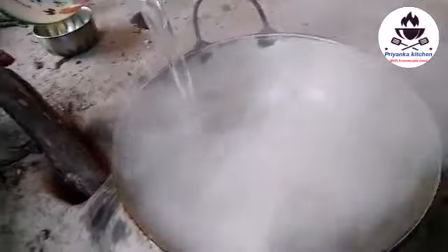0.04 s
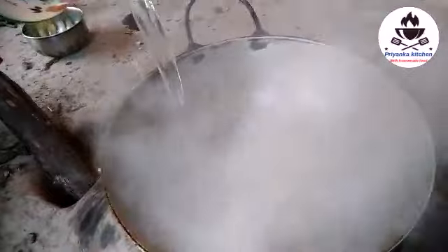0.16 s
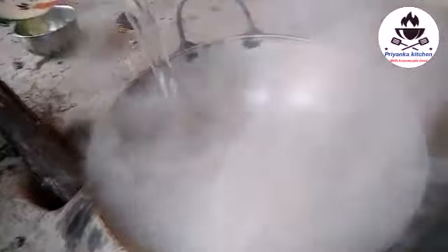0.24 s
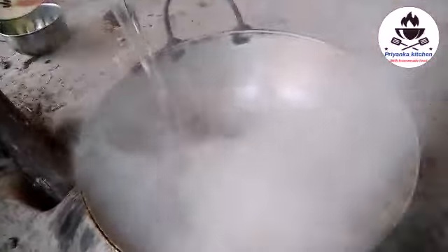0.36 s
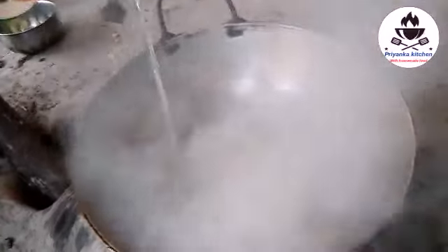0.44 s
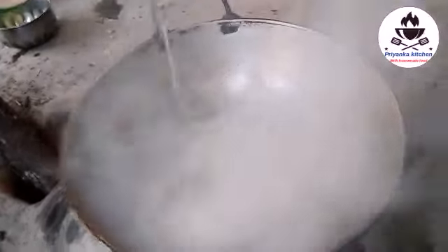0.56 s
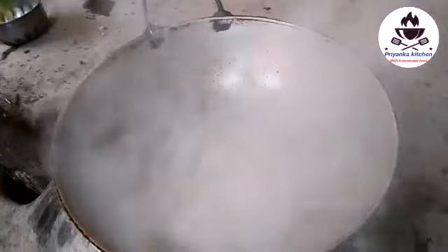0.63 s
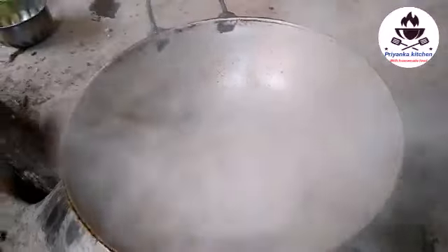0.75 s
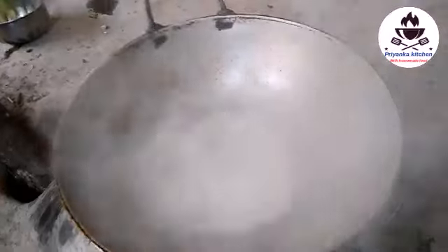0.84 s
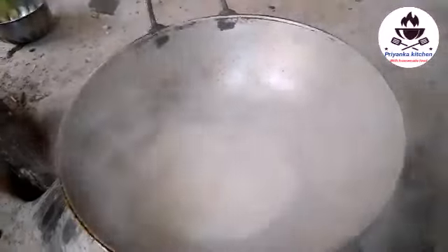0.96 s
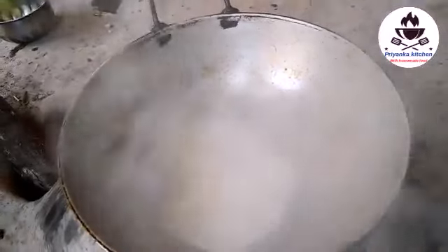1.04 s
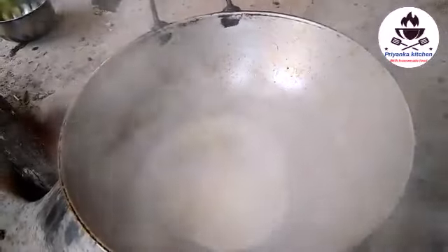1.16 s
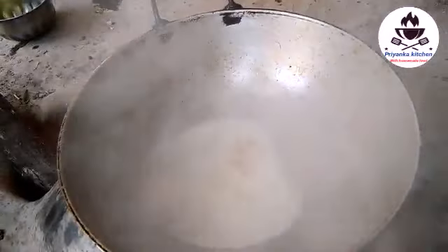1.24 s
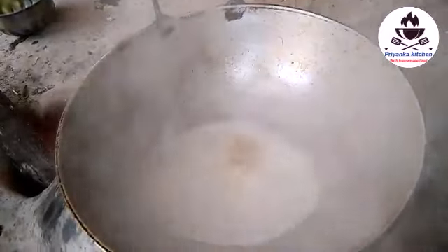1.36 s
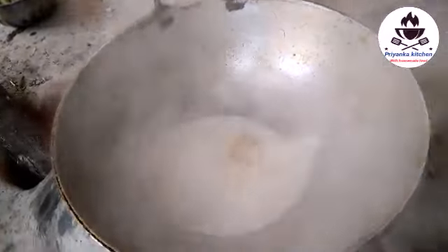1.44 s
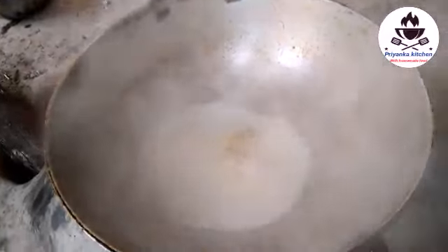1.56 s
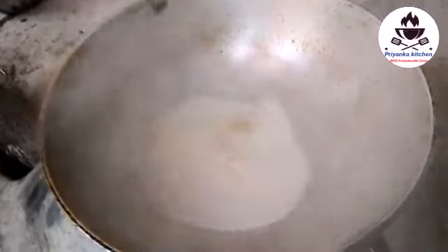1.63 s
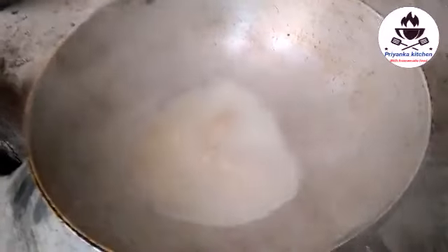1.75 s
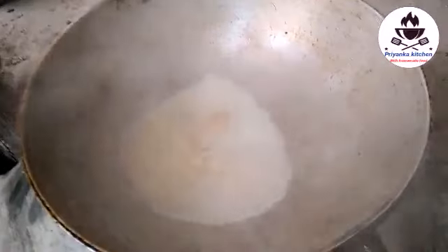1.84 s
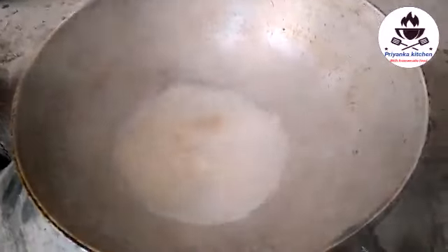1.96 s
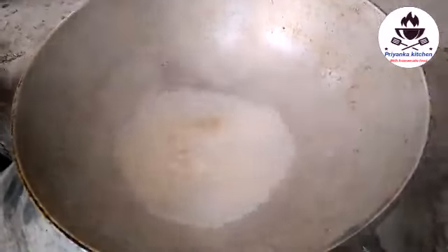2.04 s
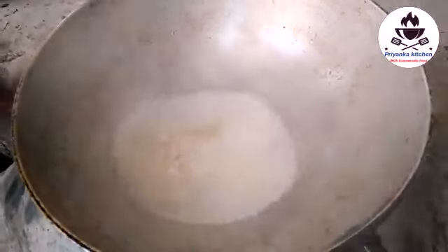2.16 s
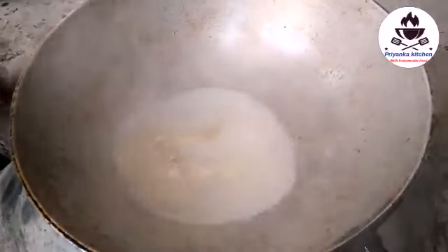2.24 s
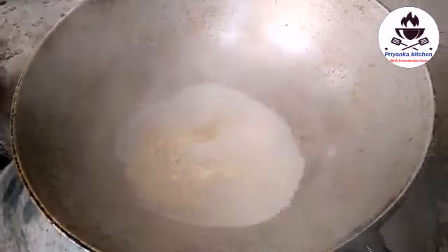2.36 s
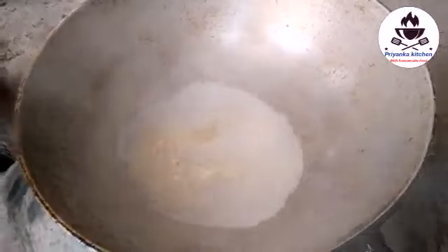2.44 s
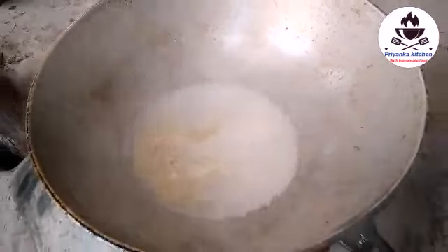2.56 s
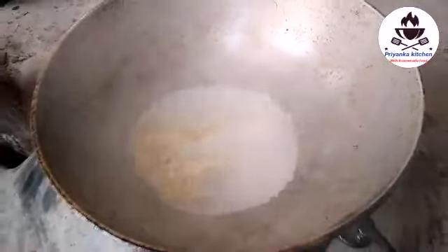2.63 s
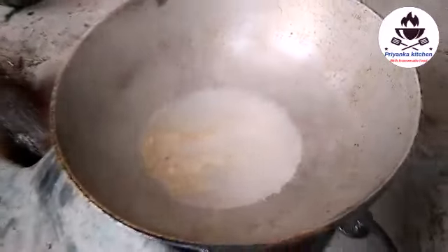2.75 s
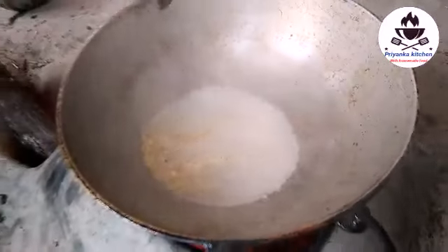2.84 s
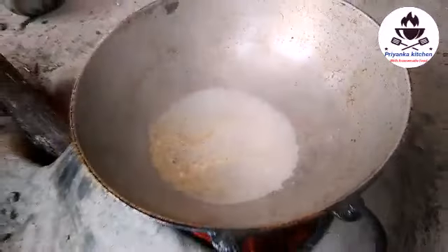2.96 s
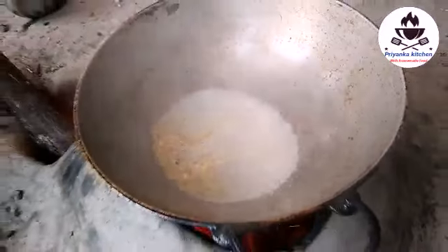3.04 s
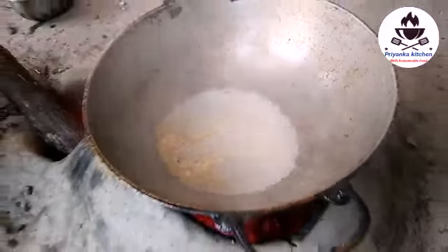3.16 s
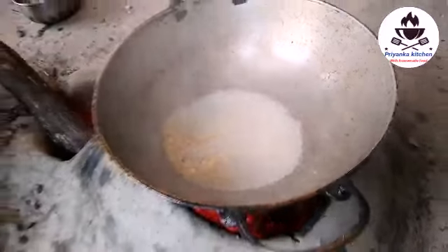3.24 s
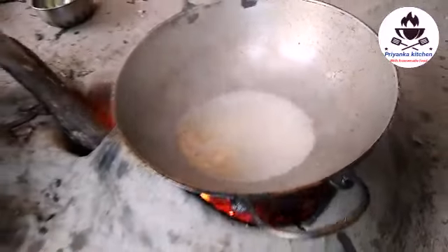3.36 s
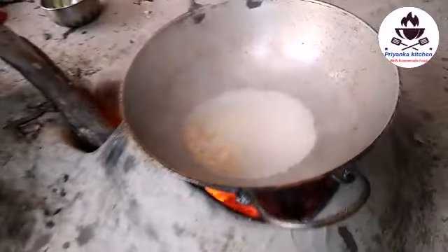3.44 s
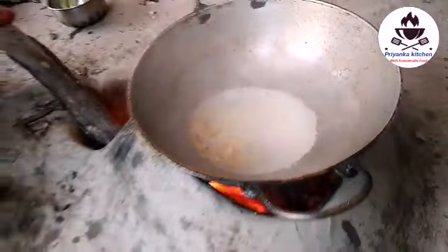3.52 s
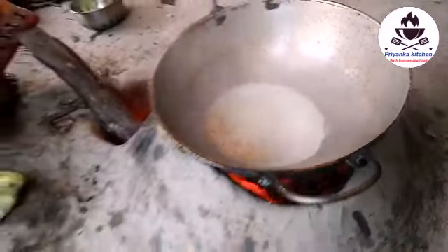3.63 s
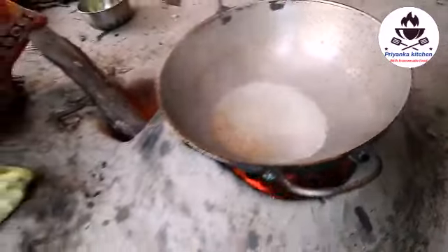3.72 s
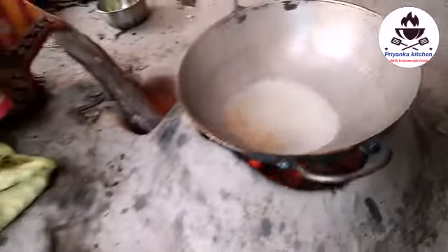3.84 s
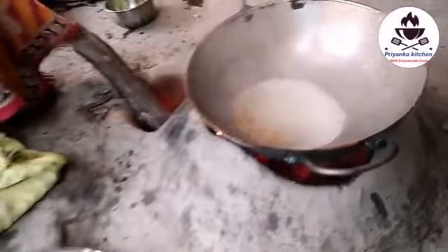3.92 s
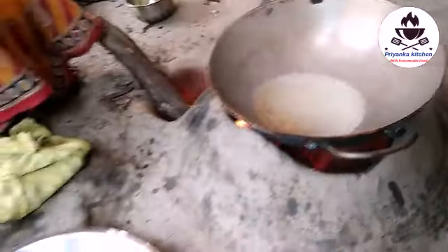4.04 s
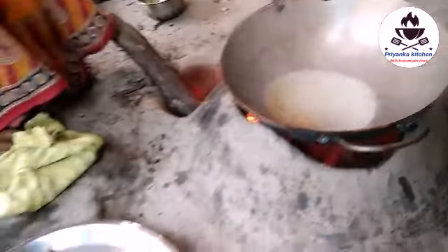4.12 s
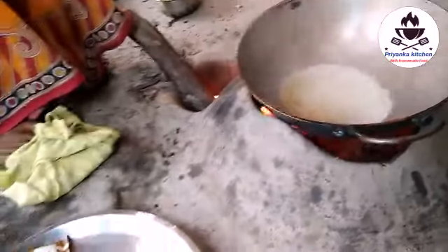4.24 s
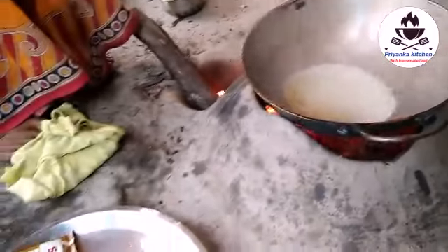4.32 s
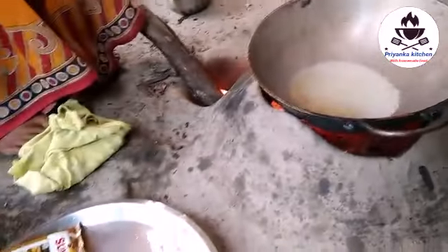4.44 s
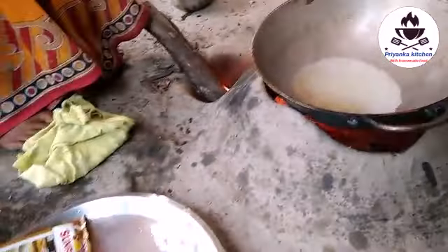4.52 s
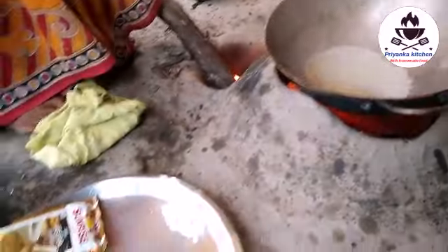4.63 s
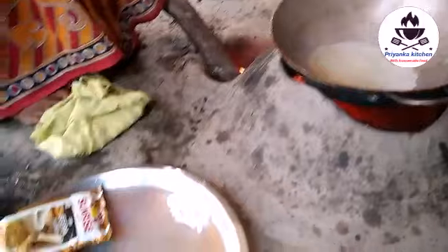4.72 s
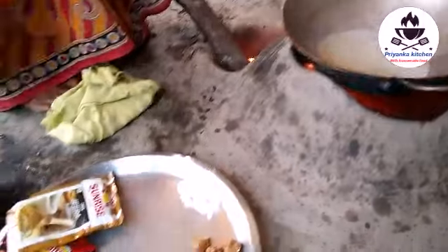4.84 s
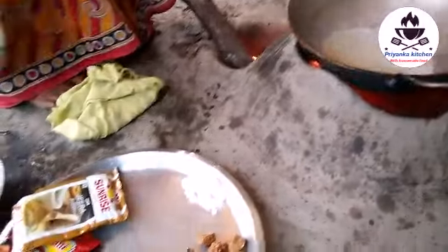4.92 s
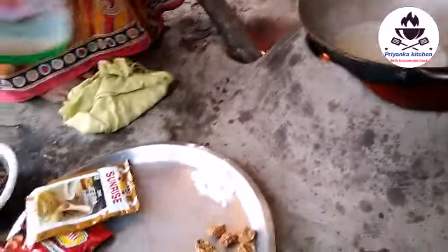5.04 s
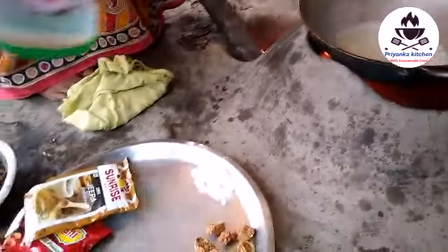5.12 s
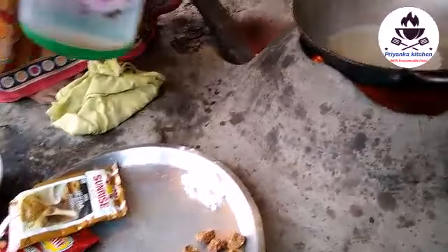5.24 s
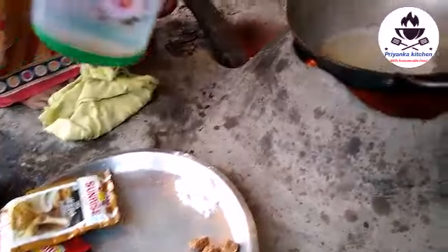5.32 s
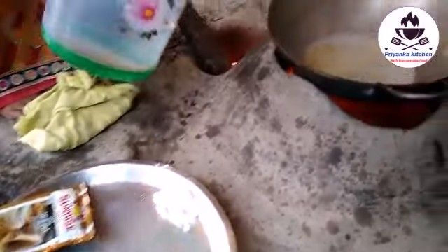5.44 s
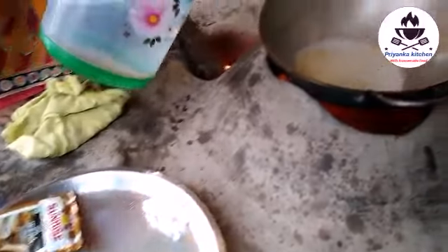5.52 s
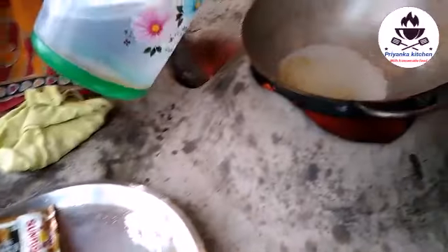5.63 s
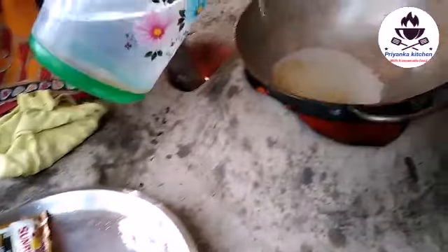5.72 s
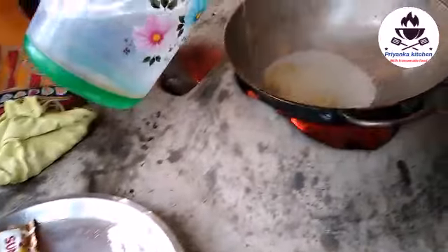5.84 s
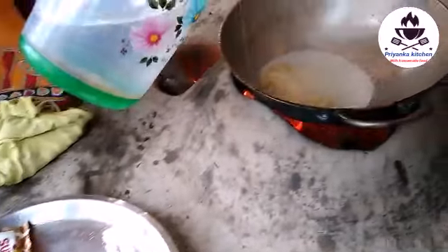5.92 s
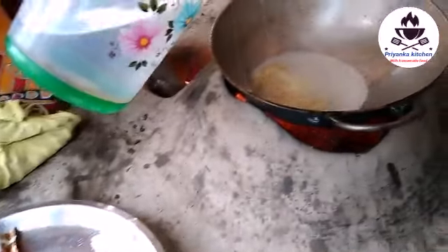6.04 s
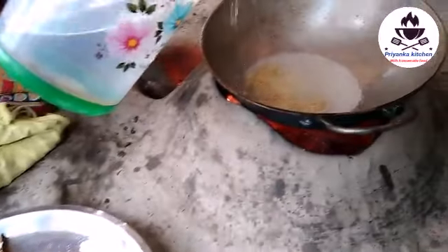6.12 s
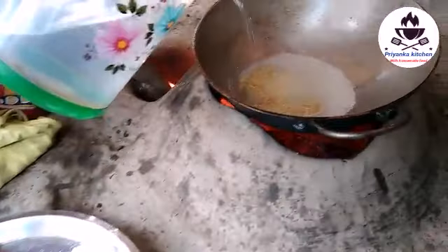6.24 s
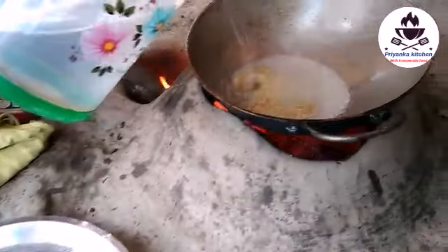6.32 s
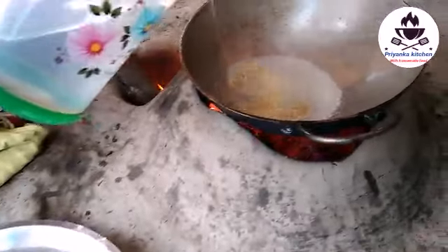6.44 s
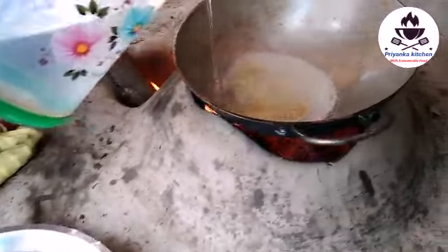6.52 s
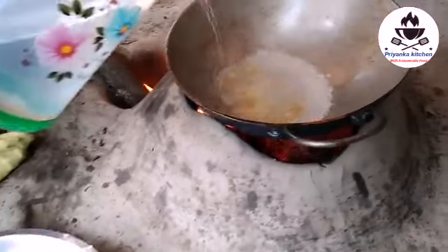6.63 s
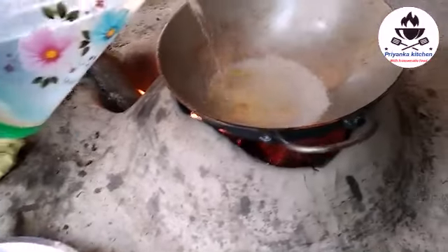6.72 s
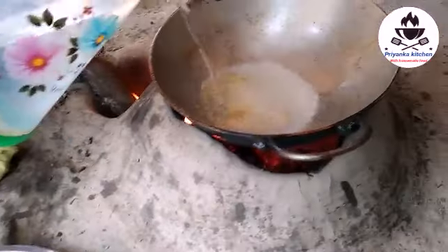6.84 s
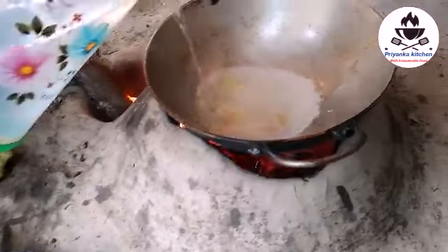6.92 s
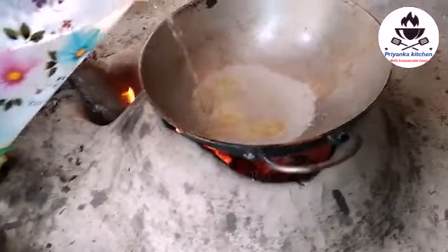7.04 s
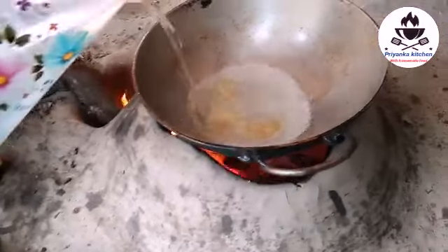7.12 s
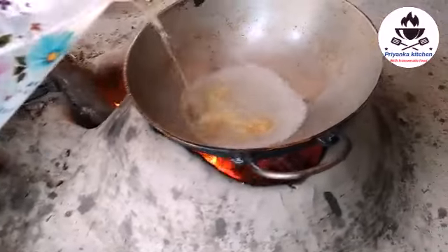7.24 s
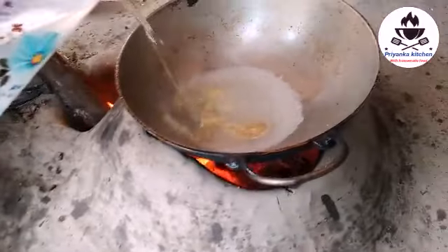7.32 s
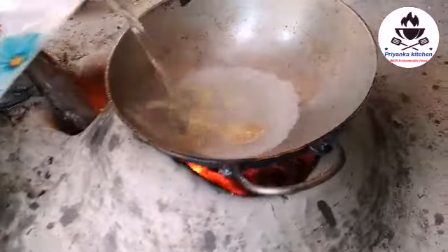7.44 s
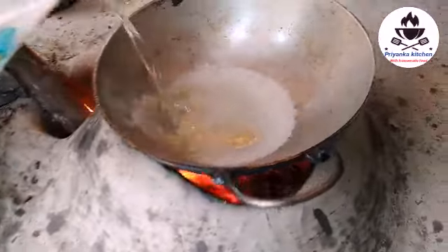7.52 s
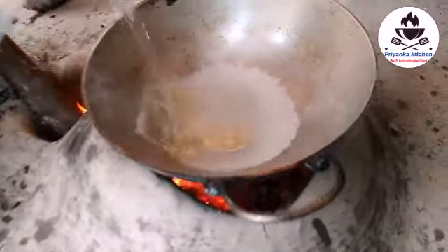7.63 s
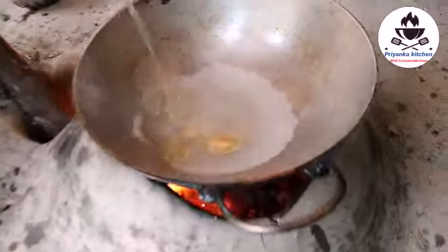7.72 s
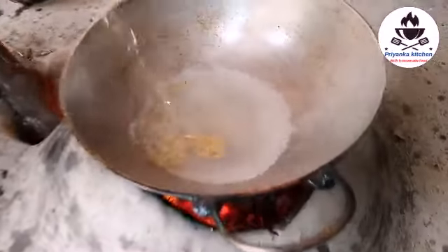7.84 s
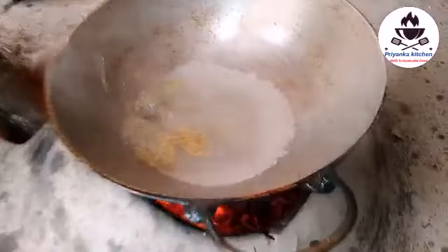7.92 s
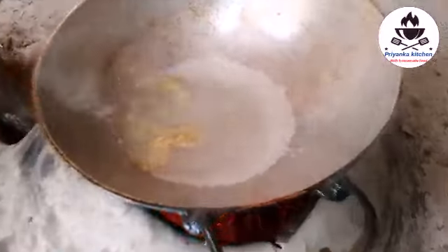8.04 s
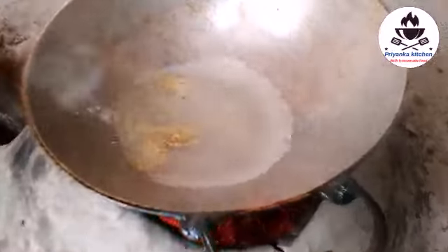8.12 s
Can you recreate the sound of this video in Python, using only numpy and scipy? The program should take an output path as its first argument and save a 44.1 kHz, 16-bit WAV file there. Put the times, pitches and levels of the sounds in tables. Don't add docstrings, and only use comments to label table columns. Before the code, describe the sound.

Close to a wide hot metal pan on a wood stove, poured water flashes into steam with a loud, dense hiss, crackling sizzle and low bubbling. After about three seconds the phone drifts away and the hiss thins. Near the end a second pour brings two sizzling flares, then the steam grows again. A stereo phone; no voice.

```python
import sys
import numpy as np
from scipy import signal
from scipy.fft import rfft, irfft, next_fast_len
from scipy.io import wavfile
from scipy.ndimage import uniform_filter1d, map_coordinates

SR = 44100
rng = np.random.default_rng(int(sys.argv[2]) if len(sys.argv) > 2 else 0)


def digitize_waveform(pressure):
    field = np.atleast_2d(pressure).T
    bounded = np.clip(field, -1, 1)
    quanta = np.round(bounded * 32767).astype(np.int16)
    wavfile.write(sys.argv[1], SR, quanta)


def linear_from_db(decibels):
    return 10 ** (np.asarray(decibels, float) / 20)


N = 360066
CONTROL = 64
FRAME_START = 836
LOUD_DB = -15


def unit(x):
    return x / np.sqrt(np.mean(x ** 2) + 1e-20)


def along(points, hz):
    f, v = np.transpose(points)
    return np.interp(np.log(hz + 1), np.log(f + 1), v)


def curves(rows):
    s, *cols = np.transpose(rows)
    return [np.interp(np.arange(N) / SR, s, c) for c in cols]


def spread(coarse):
    return np.interp(np.arange(N) / CONTROL, np.arange(len(coarse)), coarse)


def bump(start, length, rise, fall):
    t = np.arange(0, N + CONTROL, CONTROL) / SR - np.asarray(start)[:, None]
    left_over = np.asarray(length)[:, None] - t
    return np.clip(np.minimum(t / rise, 1 + left_over / fall), 0, 1)


def wobble(rate):
    steps = np.arange(0, N + 128, CONTROL)
    knots = rng.standard_normal(N // 100)
    return np.interp(np.arange(N), steps, map_coordinates(knots, [steps * rate / SR]))


# t/s, level/dB, left-right level/dB
STEAM = [(0, -14.5, -1.5), (1.0, -14, -2.4), (1.7, -15, -1.5), (2.1, -14.5, -2), (2.7, -16, -2),
         (3.1, -18, -2), (3.6, -20, -0.5), (4.1, -22.5, 0), (4.6, -24.3, .5), (5.3, -25.5, 1.5),
         (5.9, -25, 1.25), (6.3, -23.5, 1.5), (6.6, -23.5, 2), (7.0, -22.5, 1.5), (7.45, -21.5, 1),
         (7.9, -18.5, 0.5), (8.16, -18.5, -2.5)]
# t/s, length/s, fine flash level/dB, droplet flash level/dB
FLASHES = [(0.195, .07, 2, 1.5), (0.465, 0.094, 1.2, 0.4), (0.57, .06, -1.5, 1.5), (0.811, 0.076, 0.9, 2),
           (0.966, 0.065, 0.5, 0.5), (1.09, 0.081, 0.5, 2.5), (1.462, 0.062, 1.3, 0.5),
           (1.943, 0.17, 0.6, 0.5), (2.467, 0.19, 1.5, 0.3), (2.806, 0.066, 1, -0.7), (3.16, .09, 0.5, .3),
           (4.757, 0.065, 1, 1), (5.163, 0.087, 0.7, 0.5), (6.607, 0.14, 4, 6), (6.75, 0.15, 4, 2),
           (7.084, 0.24, 2.5, 3), (7.521, 0.18, 6, 4), (7.724, 0.1, 4, 3.5), (7.99, 0.062, 2, 0.5),
           (8.128, .05, 4, 0.5)]


def heat():
    steam_db, pan_db = curves(STEAM)
    start, length, fine, coarse = np.transpose(FLASHES)
    flash = bump(start, length, rise=0.03, fall=0.04)
    fine_db, coarse_db = spread(fine @ flash), spread(coarse @ flash)
    under = steam_db - LOUD_DB
    hiss_db = steam_db + fine_db
    sizzle_db = LOUD_DB - 5 + 1.057 * under + coarse_db
    boil_db = LOUD_DB - 14.5 + 0.82 * under + 0.36 * coarse_db
    return hiss_db, sizzle_db, boil_db, pan_db - 0.25 * coarse_db


def bursts(per_second, spread_db, share):
    when, size, sign = rng.random((3, 2, N))
    happens = when < per_second / SR
    pops = happens * linear_from_db(-spread_db * np.log(size + 1e-9)) * np.sign(sign - 0.5)
    share = np.clip(share, 0, 1)
    return np.sqrt(share) * unit(pops) + np.sqrt(1 - share) * rng.standard_normal((2, N))


def patchy(x, patchy_db):
    z = signal.stft(x, nperseg=512)[2]
    field = rng.standard_normal(z.shape[1:])
    field = uniform_filter1d(uniform_filter1d(field, size=8, axis=0), size=8, axis=1)
    return signal.istft(z * linear_from_db(patchy_db * unit(field)), nperseg=512)[1][..., :N]


# f/Hz, likeness 0-1
ALIKE = [(400, 0.32), (650, 0.7), (900, 0.68), (1350, 0.52), (1700, 0.24), (2500, .25), (3050, 0.26),
         (3600, 0.22), (4800, 0.25), (6000, 0.12), (14000, 0.024)]
# f/Hz, lead of the left port/rad
LEAD = [(0, 11.5), (950, -1.3), (1290, -2), (1980, -6), (3450, -10.5), (4220, -14), (4820, -16),
        (5860, -18), (6460, -19), (15000, -19)]
# f/Hz, left-right level/dB
PORTS = [(400, 13.5), (500, -0.5), (700, 0), (1200, -1.5), (2700, 1.2), (6000, -0.4), (10000, 4.5),
         (14000, 4)]


def at_ports(pair, spectrum):
    m = next_fast_len(N + 8192)
    hz = np.fft.rfftfreq(m, 1 / SR)
    common, apart = rfft(pair, m)
    turn = np.arccos(np.clip(along(ALIKE, hz), -1, 1)) / 2
    hand = np.array([[1], [-1]])
    level = linear_from_db(along(spectrum, hz) + hand * along(PORTS, hz) / 2)
    delay = np.exp(0.5j * hand * along(LEAD, hz))
    mixed = np.cos(turn) * common + hand * np.sin(turn) * apart
    return unit(irfft(level * delay * mixed, m)[:, :N])


# f/Hz, level/dB per Hz
HISS = [(4400, -58.5), (4750, -10), (5000, -8), (5300, -8.5), (5900, -7.5), (6600, -6.5), (7500, -2.5),
        (8300, -0.8), (9000, 1.5), (9800, -1.5), (11000, -4.5), (12500, -5), (13900, -7), (14600, -21)]
# f/Hz, level/dB per Hz
SIZZLE = [(1150, -46), (1400, -12.5), (1550, -7), (2000, -5), (2300, -4), (2600, -3.5), (3000, -3),
          (3300, -1), (3700, -0.5), (4600, 0.1), (4740, -1.5), (4900, -25), (5200, -62)]
# f/Hz, level/dB per Hz
BOIL = [(370, -58), (430, -4.5), (480, -2), (560, -5), (660, -6), (780, -2.5), (900, -2), (1050, 0.25),
        (1280, -1), (1420, -3.5), (1550, -12.5), (1900, -68)]
# f/Hz, level/dB per Hz
BOWL = [(500, -71), (600, -7.5), (665, 2.5), (740, -10), (880, -79)]


def steam():
    hiss_db, sizzle_db, boil_db, pan_db = heat()
    flare = 0.31 * wobble(9.9) + 0.29 * wobble(35)
    turn = np.array([pan_db, -pan_db]) / 2
    hiss = at_ports(patchy(bursts(6000, spread_db=2.0, share=0.25), patchy_db=0.79), HISS)
    sizzle = at_ports(patchy(bursts(2000, spread_db=2.0, share=0.19), patchy_db=0.95), SIZZLE)
    pockets = patchy(bursts(1500, spread_db=2.5, share=0.23), patchy_db=1.0)
    hiss += np.clip(0.022 * pan_db, 0, 0.5) * hiss[::-1]
    hiss *= linear_from_db(hiss_db + 0.56 + 0.54 * flare + 1.4 * turn)
    sizzle *= linear_from_db(sizzle_db + 0.3 + 0.53 * flare + 0.76 * turn)
    boil = at_ports(pockets, BOIL) * linear_from_db(boil_db - 0.42 + 0.92 * flare + 0.52 * turn)
    facing = np.clip(0.14 - 0.11 * pan_db, -0.2, 0.3)
    bowl = at_ports(pockets, BOWL) * linear_from_db(boil_db) * facing
    return hiss + sizzle + boil + bowl


def blips(centre_hz, spread_hz, scatter_db, lost, count):
    frames = N // 1024 + 3
    pitch, size, turn = rng.standard_normal((3, count, frames))
    kept = rng.random((count, frames)) > lost
    hz = centre_hz + spread_hz * np.clip(pitch, -2.5, 2.5)
    bins = np.round(hz * 2048 / SR).astype(int)
    z = np.zeros((1025, frames), complex)
    z[bins, np.arange(frames)] = kept * linear_from_db(scatter_db * size) * np.sign(turn)
    return unit(signal.istft(z, nperseg=2048)[1][1024 - FRAME_START:][:N])


# middle t/s, length/s, share of the upper tones lost 0-1
GAPS = [(0.093, 0.15, 0.83), (0.227, .12, 0.23), (.31, 0.083, .7), (0.395, 0.14, 0.09),
        (0.53, 0.081, 0.07), (0.642, 0.048, 0.2), (0.92, 0.098, 0.07), (1.114, 0.18, 0),
        (1.28, 0.076, 0.18), (1.409, 0.12, 0), (1.58, 0.13, 0), (2.345, 0.12, 0.06), (2.602, 0.14, 0),
        (2.832, 0.094, 0.14), (2.995, 0.047, 0.5), (3.463, 0.046, 0.2), (3.74, 0.093, 0.14),
        (4.122, 0.074, 0.1), (4.476, 0.051, 0.1), (4.554, 0.047, 1), (4.926, 0.077, .9),
        (5.62, 0.043, .3), (5.767, 0.046, 0.9), (6.094, 0.071, 0.2), (6.547, 0.038, 0.1),
        (6.76, 0.027, 0.4), (7.056, .09, .3), (7.277, 0.12, 0), (7.582, 0.19, 0.4), (7.802, 0.043, 0)]


def low_tones():
    edge_s, gap_db = 0.02, 43
    middle, length, reach = np.transpose(GAPS)
    gaps = bump(middle - length / 2, length - edge_s, edge_s, edge_s)
    deep = blips(centre_hz=170.6, spread_hz=19, scatter_db=2, lost=0.14, count=1)
    upper = blips(centre_hz=349.6, spread_hz=38, scatter_db=3.0, lost=0.35, count=3)
    under = curves(STEAM)[0] - LOUD_DB
    deep_db = -45.5 + 0.49 * under - gap_db * spread(gaps.max(axis=0))
    upper_db = -39.5 + under - gap_db * spread(np.clip(reach, 0, 1) @ gaps)
    left = linear_from_db(deep_db) * deep + linear_from_db(upper_db) * upper + gulps()
    return np.array([left, np.zeros(N)])


GULPS = [2.09, 2.92, 4.3, 4.78, 5.09, 5.45, 7.39, 7.43, 7.87]


def gulps():
    hz, half_s, level_db = 83, 0.031, -48
    swell = spread(bump(np.array(GULPS) - half_s, [half_s], half_s, half_s).max(axis=0))
    return linear_from_db(level_db) * np.sin(np.pi / 2 * swell) ** 2 * np.sin(2 * np.pi * hz * np.arange(N) / SR)


def scene():
    return steam() + low_tones()


# f/Hz, level/dB against the neighbourhood
MASK = [(230, -19.5), (300, -6.5), (450, -4), (650, -3), (1050, -6), (1350, -5.5), (2000, -4), (2900, -3),
        (4000, -3.5), (4800, -4.5), (5100, -2.5), (6000, -1.5), (6600, -17), (8000, -40)]


def masked(x, mask, joint_hz=1250):
    hz, _, z = signal.stft(x, SR, nperseg=2048)

    def rotate(v):
        sum_difference = np.array([v[0] + v[1], v[0] - v[1]]) / np.sqrt(2)
        return np.where(hz[:, None] > joint_hz, sum_difference, v)

    z = rotate(z)
    power = np.abs(z) ** 2
    around = uniform_filter1d(uniform_filter1d(power.mean(axis=0), size=41, axis=0), size=7, axis=1)
    own = uniform_filter1d(uniform_filter1d(power, size=4, axis=1), size=3, axis=2)
    keep = own > around * linear_from_db(along(mask, hz))[:, None] ** 2
    return signal.istft(rotate(z * keep), nperseg=2048)[1][:, :N]


def filtered(x, response):
    m = next_fast_len(N + 8192)
    return irfft(rfft(x, m) * response(np.fft.rfftfreq(m, 1 / SR)), m)[..., :N]


SHARED_BINS = np.r_[292, np.arange(320, 705, 32)]


def shared_treble(x):
    frame = dict(window=np.sin(np.pi * (np.arange(2048) + 0.5) / 2048), nperseg=2048)
    shift = 1024 - FRAME_START
    z = signal.stft(np.pad(x, ((0, 0), (shift, 0))), **frame)[2]
    for lo, hi in zip(SHARED_BINS[:-1], SHARED_BINS[1:]):
        left, right = z[:, lo:hi]
        sign = np.sign(np.real(left * right.conj()).sum(axis=0))
        both = left + sign * right
        size = np.linalg.norm(z[:, lo:hi], axis=1) / (np.linalg.norm(both, axis=0) + 1e-12)
        z[:, lo:hi] = [size[0] * both, sign * size[1] * both]
    return signal.istft(z, **frame)[1][:, shift:shift + N]


def low_pass(x):
    return signal.sosfilt(signal.butter(12, 15400, fs=SR, output="sos"), x)


def record(dry):
    heard = masked(np.clip(dry, -0.8, 0.8), MASK)
    limited = filtered(heard, lambda hz: (hz > 45) & (hz < 14330))
    return low_pass(np.clip(shared_treble(limited), -1, 1))


dry = scene()
out = record(dry)
digitize_waveform(out)
```